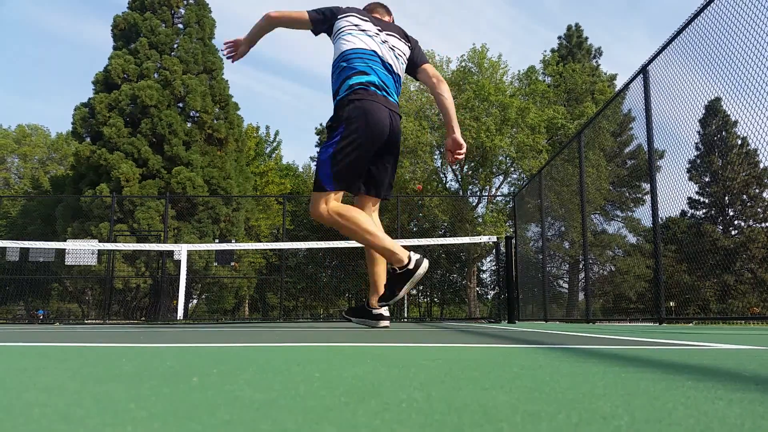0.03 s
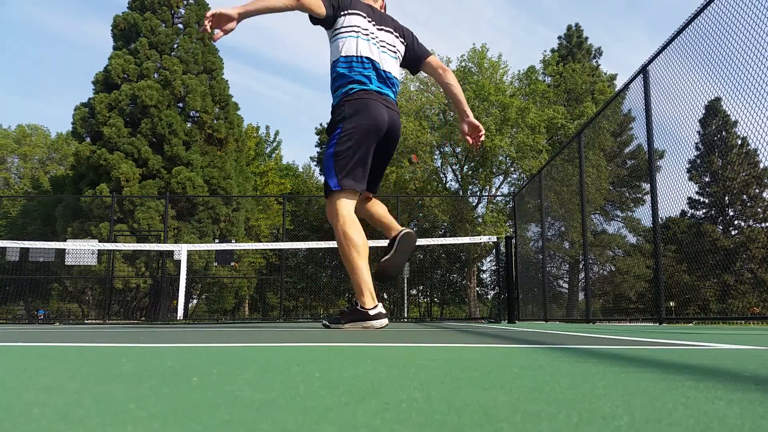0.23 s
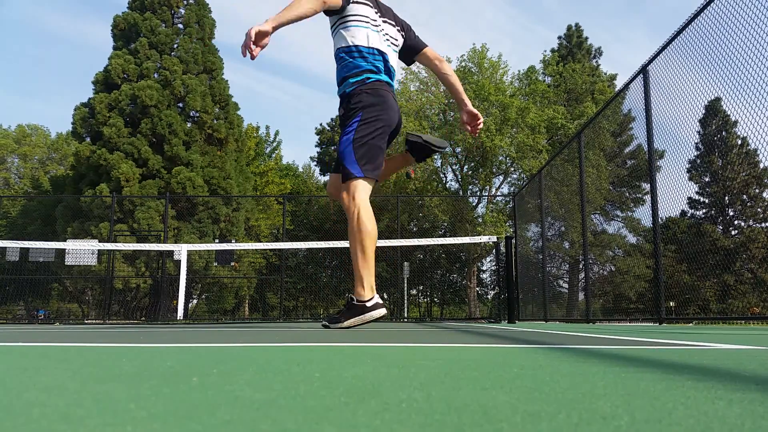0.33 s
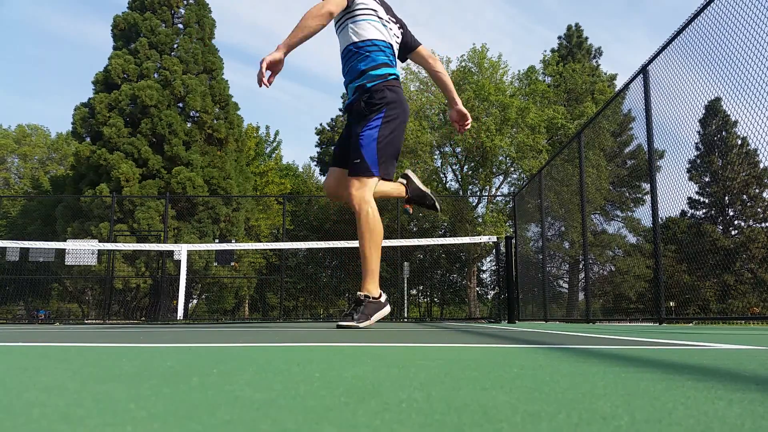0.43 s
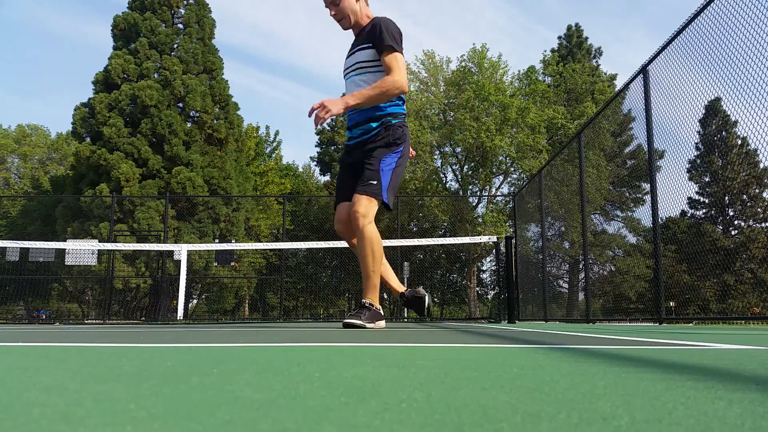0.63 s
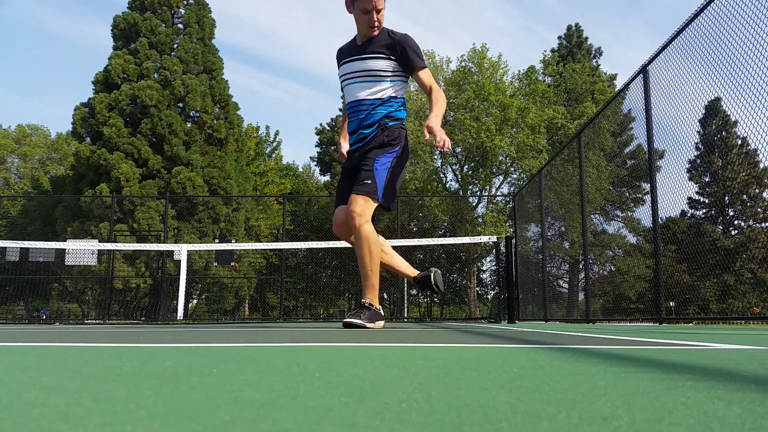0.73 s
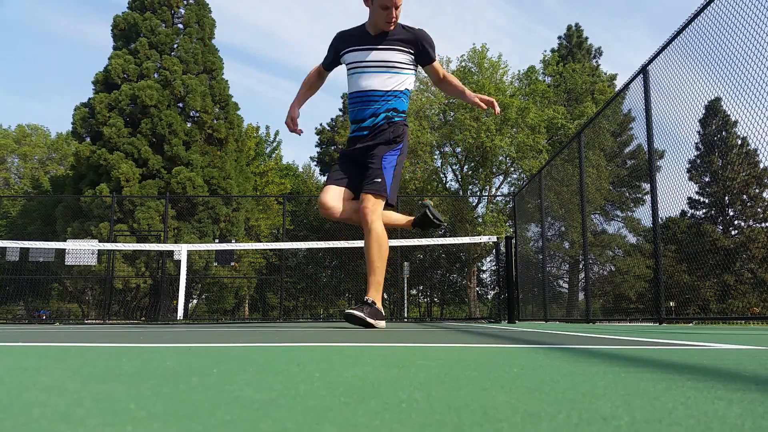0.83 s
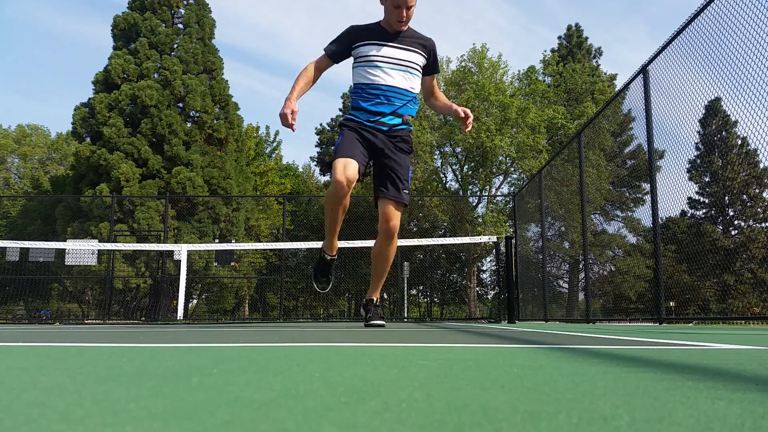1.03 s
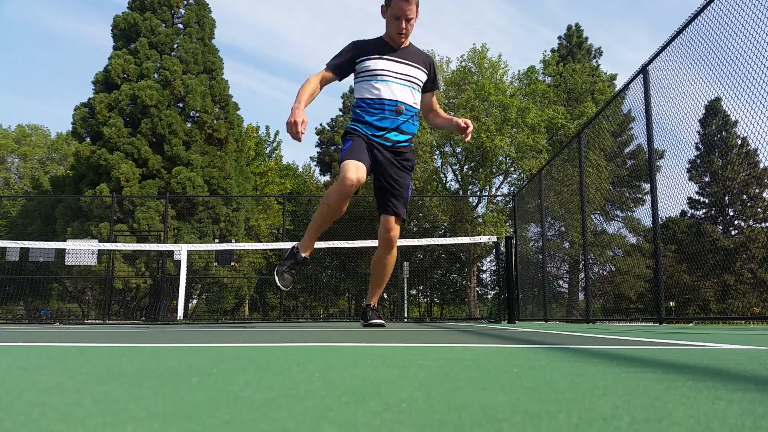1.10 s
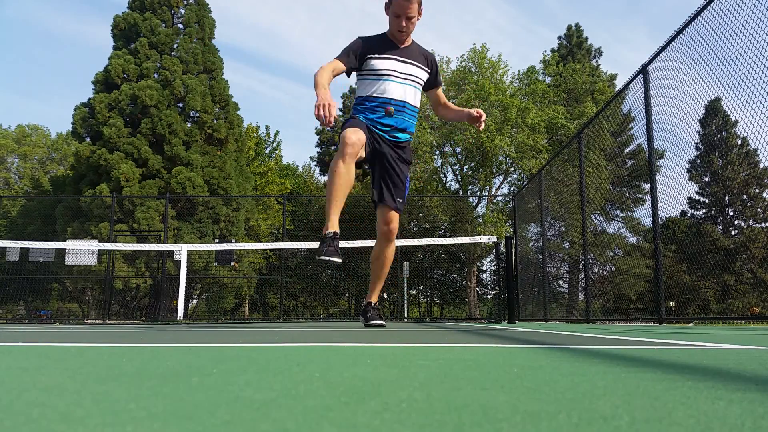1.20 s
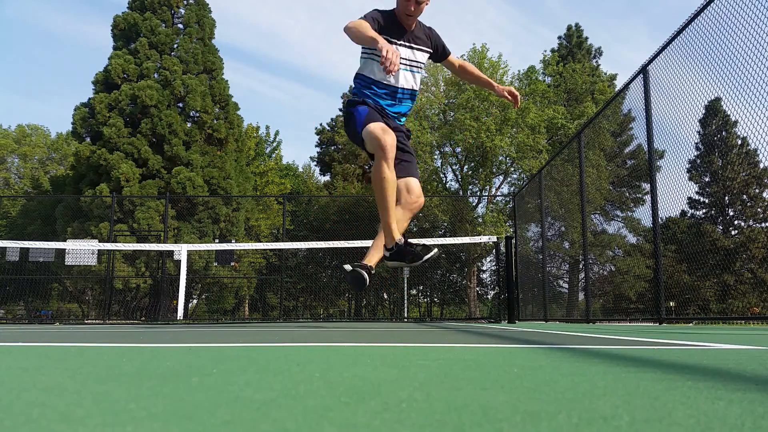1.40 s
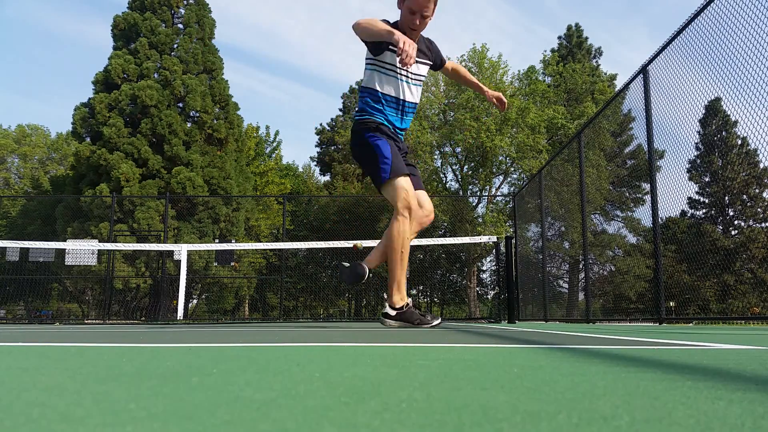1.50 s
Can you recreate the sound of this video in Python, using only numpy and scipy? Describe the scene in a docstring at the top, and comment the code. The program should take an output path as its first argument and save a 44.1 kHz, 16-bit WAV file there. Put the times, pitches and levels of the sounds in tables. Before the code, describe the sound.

Shoes thud and scuff on a hard outdoor court as a player kicks a footbag.

```python
"""A hard outdoor court, with distant traffic rumbling under a thin hiss of air.
A few metres from a microphone near the ground, a player keeps a footbag up.
Feet land in soft, pitch-dropping thuds, and a shoe slaps down and rings briefly.
The sole scuffs over gritty paint, clothes swish, and the bag's filling ticks on the shoe."""
import sys
import numpy as np
from scipy import signal
from scipy.fft import rfft, irfft, next_fast_len
from scipy.io import wavfile

SR = 44100
rng = np.random.default_rng(int(sys.argv[2]) if len(sys.argv) > 2 else 0)


def dump_mix(stems):
    """Bounce the given channels to the path in sys.argv[1] as a 16-bit WAV at rate SR."""
    frames = np.atleast_2d(stems).T  # one column per channel
    limited = np.clip(frames, -1, 1)  # hard clip at full scale
    pcm = np.round(limited * 32767).astype(np.int16)
    wavfile.write(sys.argv[1], SR, pcm)


N = 68355
T = np.arange(N) / SR
PADDED = 2 * next_fast_len(N)
HZ = np.maximum(np.arange(PADDED // 2 + 1) * SR / PADDED, 1)


def from_db(db):
    """Decibels to gain."""
    return 10 ** (np.asarray(db) / 20)


def unit_rms(x):
    """Scale to an rms of 1."""
    return x / np.sqrt(np.mean(x ** 2) + 1e-20)


def curve(points):
    """Join breakpoints into a curve over log frequency."""
    hz, value = np.transpose(points)
    return np.interp(np.log(HZ), np.log(hz), value)


def eq(x, db):
    """Minimum-phase EQ with a gain in dB at every frequency."""
    cepstrum = irfft(np.log(from_db(db)))
    cepstrum[1:PADDED // 2] *= 2
    cepstrum[PADDED // 2 + 1:] = 0
    return irfft(rfft(x, PADDED) * np.exp(rfft(cepstrum)))[..., :N]


def butter(x, hz, kind, order=2):
    """Butterworth low- or high-pass."""
    return signal.sosfilt(signal.butter(order, hz, kind, fs=SR, output="sos"), x + 1e-18)


def ring(x, modes):
    """Each hit sets the modes ringing as dying sines."""
    out = 0
    for hz, db, t60 in modes:
        radius = np.exp(-np.log(1000) / (t60 * SR))
        angle = 2 * np.pi * hz / SR
        feedback = [1, -2 * radius * np.cos(angle), radius ** 2]
        out = out + from_db(db) * signal.lfilter([0, np.sin(angle)], feedback, x + 1e-18)
    return out


def swell(peak_s, rise, fall):
    """Envelope with an exponential rise and fall around its peak."""
    return np.exp(-np.maximum((peak_s - T) / rise, (T - peak_s) / fall))


def pan(pair, balance):
    """Pan each frequency, keeping the mean of the left and right gains."""
    lean_db = curve(balance)
    right_db = -20 * np.log10((1 + from_db(lean_db)) / 2)
    return np.array([eq(pair[0], right_db + lean_db), eq(pair[1], right_db)])


# Stereo width of the ambience: (frequency [Hz], left-right correlation [-1..1])
AMBIENCE_CORRELATION = [(60, 1), (130, 0.91), (290, 0.72), (640, -0.34), (1400, -0.18), (3100, 0.17),
                        (15000, -0.21)]
def diffuse(spectrum):
    """Noise from all around: near mono in the bass, wide in the treble."""
    alike = np.clip(curve(AMBIENCE_CORRELATION), -.99, .99)
    mid = eq(rng.standard_normal(N), curve(spectrum) + 10 * np.log10(1 + alike))
    side = eq(rng.standard_normal(N), curve(spectrum) + 10 * np.log10(1 - alike))
    return np.array([mid + side, mid - side]) / np.std(mid)


# Tone of the rumble: (frequency [Hz], relative level [dB])
TRAFFIC_EQ = [(12, -41), (20, -31), (43, -9), (107, -1.5), (144, -6.5), (177, -3.5), (275, -9),
              (369, -14.5), (573, -17.5), (721, -19.5), (784, -20), (1070, -25.5), (3000, -34), (3900, -66),
              (6600, -120)]
# Resonances in the traffic: (frequency [Hz], width [Hz], level [dB])
TRAFFIC_DRONES = [(102.1, 7.3, -51), (172.93, 5.6, -52)]
def traffic():
    """Far traffic: a dark noise bed with two low, narrow drones."""
    rumble = from_db(-43) * butter(diffuse(TRAFFIC_EQ), hz=2560, kind="low", order=4)
    for hz, width_hz, db in TRAFFIC_DRONES:
        resonance = 1 / (1 + (2 * (HZ - hz) / width_hz) ** 2)
        drone = irfft(rfft(rng.standard_normal(PADDED)) * resonance)[:N]
        rumble = rumble + from_db(db) * unit_rms(drone)
    return rumble


# Tone of the air's hiss: (frequency [Hz], relative level [dB])
HISS_EQ = [(1000, -3), (3000, -5), (6300, -9.5), (7000, -5.5), (7400, 0.5), (8200, -27), (9700, -23.5),
           (11000, -14), (16000, -7)]
# Pan of the ambience: (frequency [Hz], left minus right [dB])
AMBIENCE_PAN = [(60, -1.5), (200, 1.5), (380, -0.5), (700, 7.5), (2400, 7), (4400, 9.5), (7500, 16),
                (10000, -6.5), (15000, 1)]
def ambience():
    """The steady bed: traffic with a thin hiss on top."""
    return pan(traffic() + from_db(-70.5) * diffuse(HISS_EQ), AMBIENCE_PAN)


def court_reverb(x, level_db=-25.5, t60_s=0.49, predelay_s=0.018, top_hz=5000):
    """Faint scatter from fence and trees, different on each side."""
    tail = rng.standard_normal((2, N)) * (T > predelay_s) * np.exp(-np.log(1000) * T / t60_s)
    tail /= np.sqrt(np.sum(tail ** 2) / 2)
    tail = butter(tail, top_hz, "low", order=1)
    return from_db(level_db) * irfft(rfft(x, PADDED) * rfft(tail, PADDED))[:, :N]


# Long sweeps of shoe and cloth: (peak time [s], level [dB], rise [s], fall [s])
SWISH_CUES = [(0.574, -45.5, .027, 0.029), (0.601, -42, .016, 0.0093), (0.735, -63.5, 0.022, .05),
              (0.875, -63.5, 0.058, 0.036), (1.30, -69, 0.094, 0.089)]
# Tone of the friction: (frequency [Hz], relative level [dB])
SWISH_EQ = [(300, -21), (1300, -1), (2700, -4.5), (4000, 0), (5500, -2), (7400, -6), (8500, -13),
            (11500, -12.5), (13000, -21), (16000, -26)]
def swishes():
    """The sole pivots on the court and clothes brush: smooth friction that swells and fades."""
    power = sum((from_db(db) * swell(s, rise, fall)) ** 2 for s, db, rise, fall in SWISH_CUES)
    friction = unit_rms(eq(rng.standard_normal(N), curve(SWISH_EQ)))
    return np.sqrt(power) * friction


def grains(spectrum, per_second=9000, spread_db=5.5):
    """Grit texture: dense tiny clicks of uneven size."""
    sizes = from_db(spread_db * np.minimum(rng.exponential(1, N), 4))
    signs = rng.choice([-1, 1], N)
    hits = rng.random(N) < per_second / SR
    return unit_rms(eq(sizes * signs * hits, curve(spectrum)))


# Crunches: (peak time [s], level [dB], rise [s], fall [s], edge gain [dB])
SCUFF_CUES = [(0.2317, -32, 0.00048, 0.0043, -20), (0.2575, -41, 0.0063, 0.0057, -12),
              (0.274, -60, .0004, .001, 7), (0.606, -46, .006, 0.01, -2), (0.68, -53.5, 0.0038, 0.027, 0.5),
              (1.041, -49.5, .003, 0.0018, 4.5), (1.1632, -51.5, 0.00076, 0.013, 1),
              (1.177, -47, 0.0047, 0.0049, -1.5), (1.194, -65, 0.0066, 0.039, 1),
              (1.2623, -58, .0004, .002, -10), (1.399, -57.5, 0.0056, 0.03, -8.5),
              (1.485, -43, 0.00027, 0.0007, -3.5)]
# Dull body of the grit: (frequency [Hz], relative level [dB])
GRIT_BODY_EQ = [(200, 4), (500, -4.5), (1400, 9.5), (2100, 4), (3000, -17), (8000, -23), (16000, -49)]
# Bright edge of the grit: (frequency [Hz], relative level [dB])
GRIT_EDGE_EQ = [(500, -34), (2000, 3.5), (3500, 4.5), (5000, 3), (7300, 2.5), (8500, -6.5), (11000, -4.5),
                (16000, -6.5)]
def scuffs(body_db=1):
    """Grit under the sole and the bag's filling crunch in short bursts of grains."""
    body = from_db(body_db) * grains(GRIT_BODY_EQ)
    edge = grains(GRIT_EDGE_EQ)
    return sum(from_db(db) * swell(s, rise, fall) * (body + from_db(edge_db) * edge)
               for s, db, rise, fall, edge_db in SCUFF_CUES)


# Light touches of the bag: (time [s], level [dB])
TAP_CUES = [(1.2622, -36), (1.3964, -44.5)]
# Ring of the bag: (frequency [Hz], gain [dB], 60 dB decay time [s])
BAG_MODES = [(1415, -1, 0.018), (1800, -3.5, 0.0076), (3100, -18, 0.0061)]
def taps():
    """The bag clicks lightly against the shoe."""
    clicks = np.zeros(N)
    for s, db in TAP_CUES:
        clicks[int(s * SR)] = from_db(db)
    return ring(clicks, BAG_MODES)


# Hard contacts of sole and bag: (time [s], level [dB], hardness [Hz])
SLAP_CUES = [(0.2326, -14, 1840), (0.2351, -14, 1190), (0.2378, -21, 610), (0.2543, -29.5, 600),
             (1.1641, -32.5, 1190), (1.175, -42, 1800)]
# Ring of the shoe: (frequency [Hz], gain [dB], 60 dB decay time [s])
SHOE_MODES = [(800, -23.5, 0.021), (1110, -39.5, 0.025), (2030, -25.5, 0.015)]
def slaps(low_cut_hz=188):
    """Each contact is one push, shorter when harder, that also rings the shoe."""
    push = 0
    for s, db, hardness_hz in SLAP_CUES:
        age = 2 * np.pi * hardness_hz * np.maximum(T - s, 0)  # the push peaks at age 1
        push = push - from_db(db) * age * np.exp(1 - age)
    return butter(push, low_cut_hz, "high", order=1) + ring(push, SHOE_MODES)


# Weight landing on a shoe: (time [s], level [dB], start pitch [Hz], pitch fall [s], decay [s])
THUD_CUES = [(0.2346, -7, 466, 0.0045, .0042), (0.3497, -23, 217, 0.0058, 0.013),
             (1.163, -24.5, 510, 0.0072, 0.0058)]
def thuds(rest_hz=74.4, attack_s=0.0007):
    """The sole squashes: a few cycles whose pitch falls as the weight settles."""
    out = 0
    for s, db, start_hz, fall, decay in THUD_CUES:
        t = np.maximum(T - s, 0)
        cycles = rest_hz * t + (start_hz - rest_hz) * fall * (1 - np.exp(-t / fall))
        envelope = (1 - np.exp(-t / attack_s)) * np.exp(-t / decay)
        out = out - from_db(db) * envelope * np.sin(2 * np.pi * cycles)
    return out


# Pan of the player: (frequency [Hz], left minus right [dB])
PLAYER_PAN = [(80, 0.5), (200, 0), (380, 5), (700, 6), (2300, 6.5), (4400, 16.5), (7200, 16.5), (8500, 7),
              (10500, -6.5), (15000, -7)]
def scene():
    """The mix: player and court reverb, leaning left, over the ambience."""
    player = thuds() + slaps() + taps() + scuffs() + swishes()
    return pan(player + court_reverb(player), PLAYER_PAN) + ambience()


def record(dry, top_hz=15900):
    """A steep high cut on the master."""
    return signal.sosfilt(signal.ellip(10, .1, 80, top_hz, fs=SR, output="sos"), dry)


dry = scene()
out = record(dry)
dump_mix(out)
```